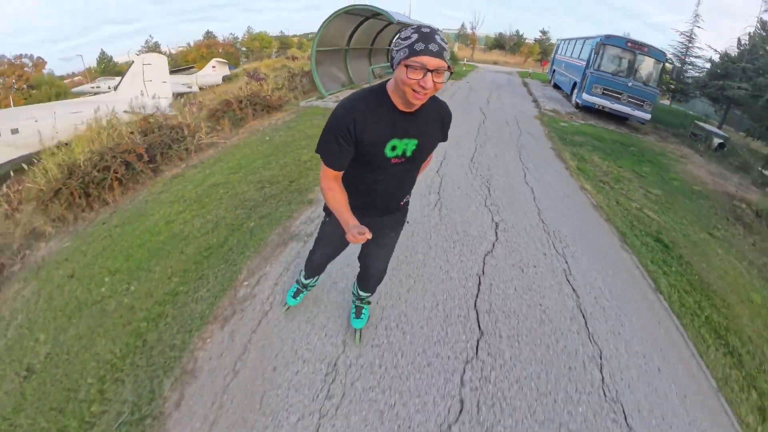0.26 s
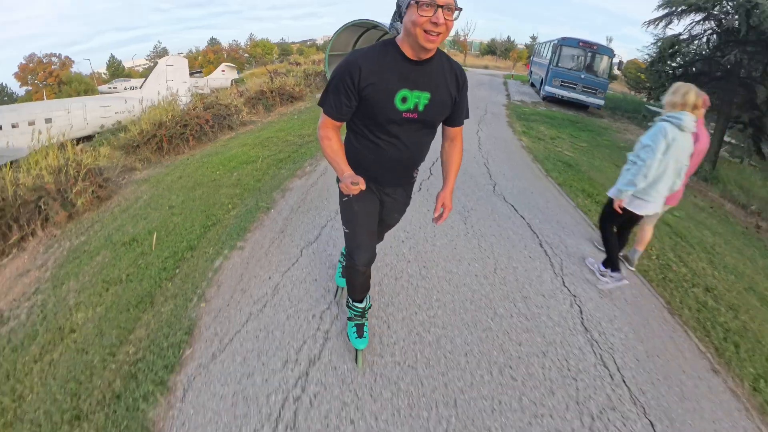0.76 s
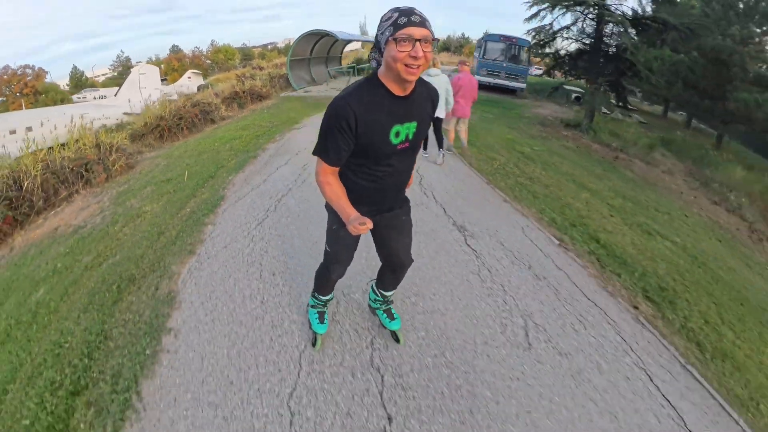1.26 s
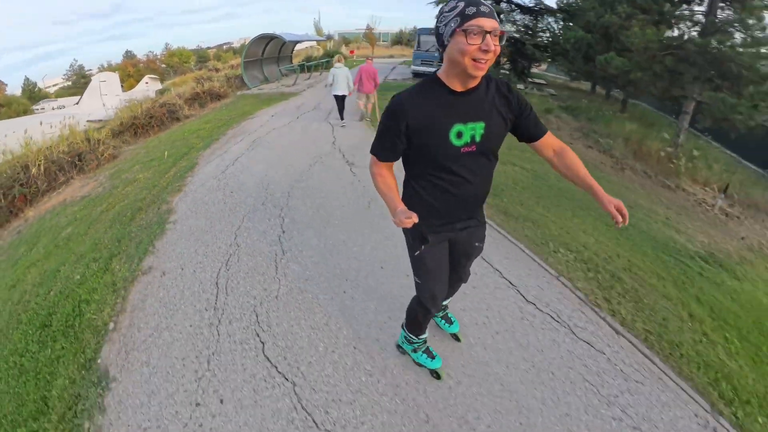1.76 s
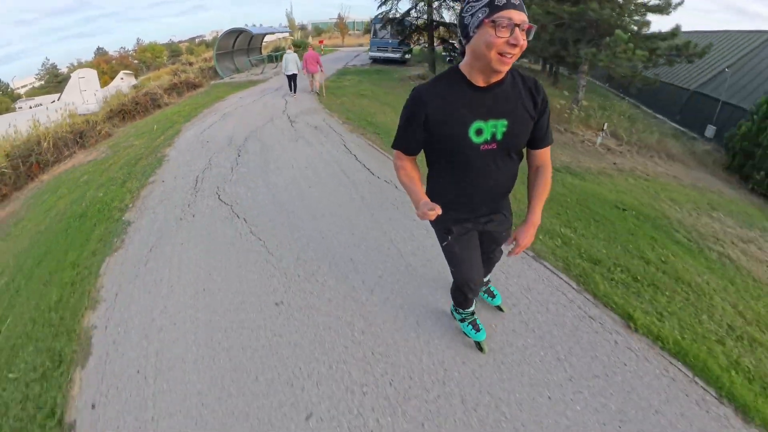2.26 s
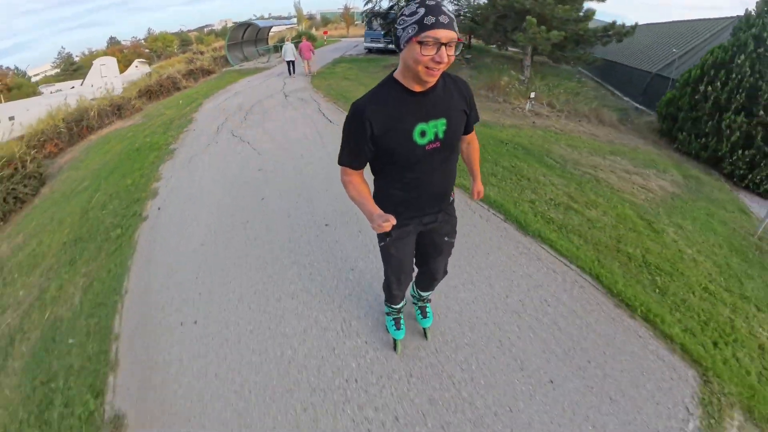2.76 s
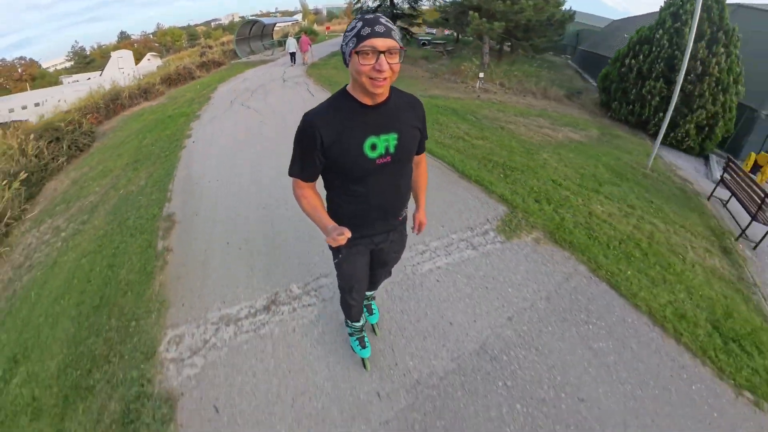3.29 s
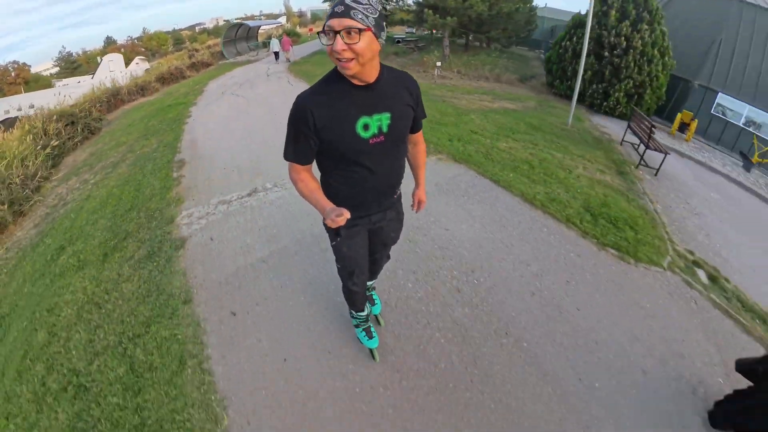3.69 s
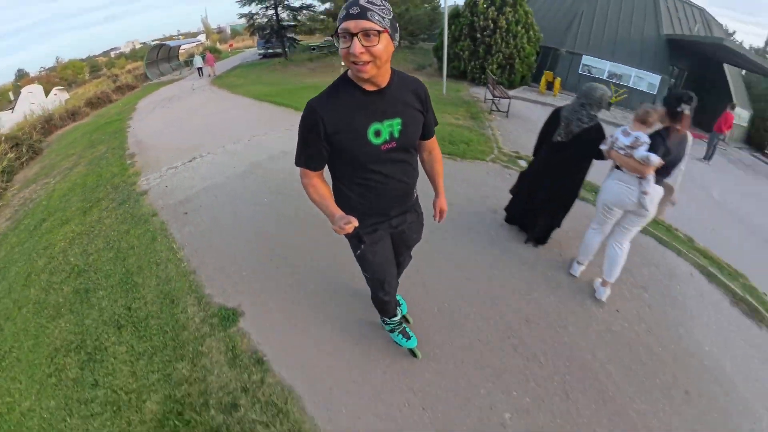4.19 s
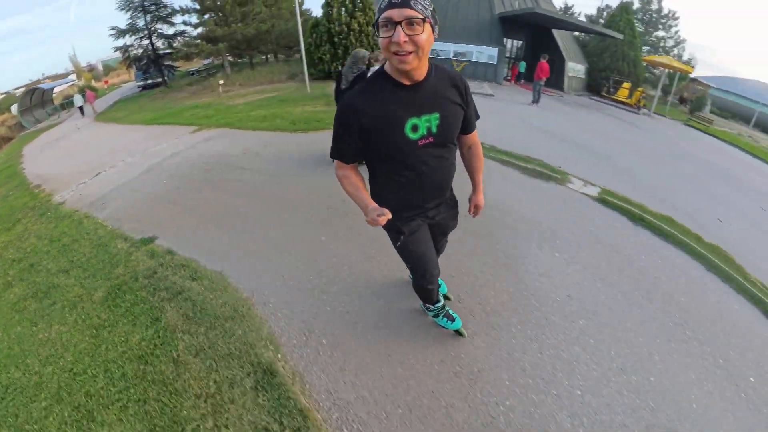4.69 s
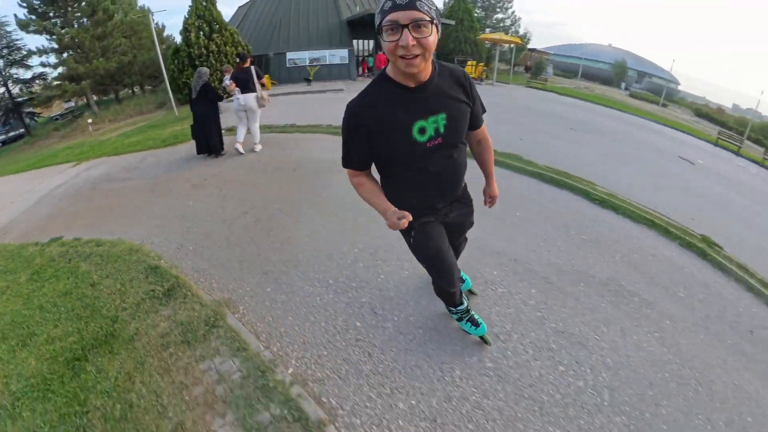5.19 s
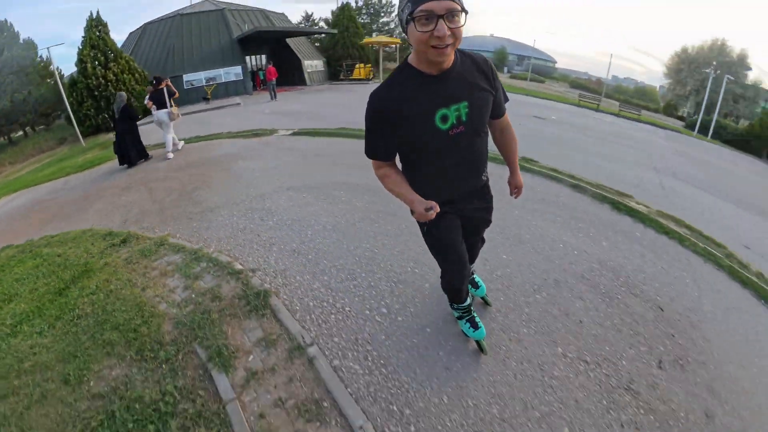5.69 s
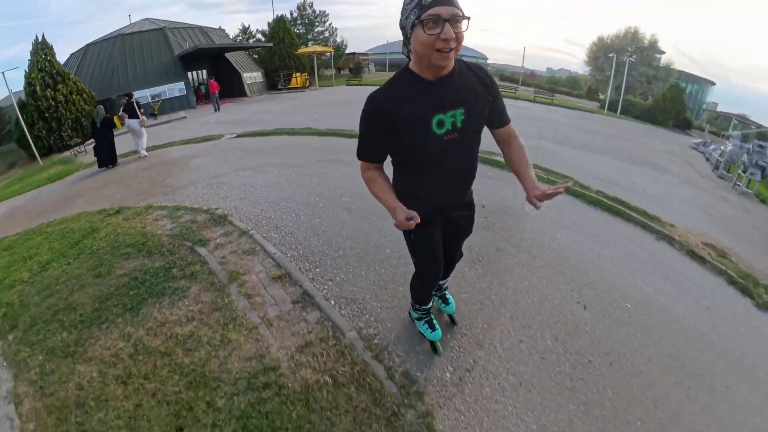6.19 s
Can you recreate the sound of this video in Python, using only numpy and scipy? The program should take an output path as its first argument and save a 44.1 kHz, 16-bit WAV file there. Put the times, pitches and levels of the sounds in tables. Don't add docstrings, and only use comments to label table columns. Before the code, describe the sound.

Wind buffets and rumbles against a microphone in heavy gusts while inline skate wheels hum and crackle over rough, cracked pavement outdoors.

```python
import sys
import numpy as np
from scipy import signal
from scipy.fft import rfft, irfft
from scipy.io import wavfile
from scipy.ndimage import uniform_filter1d, map_coordinates

SR = 44100
rng = np.random.default_rng(int(sys.argv[2]) if len(sys.argv) > 2 else 0)


def wrap_up_sound(samples):
    columns = np.atleast_2d(samples).T
    tamed = np.clip(columns, -1, 1)
    steps = np.round(tamed * 32767).astype(np.int16)
    wavfile.write(sys.argv[1], SR, steps)


def gain_from_db(level_db):
    decades = np.asarray(level_db, float) / 20
    return 10 ** decades


N = 284445

# [t/s, level/dB]
WIND_LEVEL = [(0.0, -32), (0.44, -40), (0.52, -26.5), (0.68, -37), (0.84, -19), (0.96, -28), (1.2, -22.5),
              (1.36, -21), (1.53, -35.5), (2.05, -35.5), (2.26, -37.5), (2.6, -29.5), (3.05, -33),
              (3.36, -24.5), (3.85, -21), (4.28, -26.5), (4.4, -24.5), (4.56, -37), (5.4, -35),
              (6.1, -39.5), (6.45, -41.5)]
# [t/s, ratio/1]
WIND_SPEED = [(.4, 0.84), (.53, 0.98), (.66, 0.91), (.9, 1.04), (1.02, 0.88), (1.3, 1.11), (1.5, 0.77),
              (2.3, 0.68), (2.6, 1.03), (3.2, 0.7), (3.34, 1.2), (3.6, 1.344), (4.0, 1.03), (4.2, 0.72),
              (4.36, 0.68), (4.55, 0.48)]
# [t/s, level/dB]
AIR_SHOVES = [(0.052, -34), (.5, -20), (.58, -18.5), (.66, -18), (.74, -19), (.92, -20), (1.03, -25),
              (2.53, -32.5), (3.2, -37), (3.33, -22), (3.39, -19), (3.46, -17), (3.58, -16), (3.93, -20.5),
              (4.12, -39), (4.43, -21.5), (6.36, -28.5)]
# [f/Hz, level/dB per Hz]
PUSH_SPECTRUM = [(10, -2), (16, -2), (25, -9), (40, -8.5), (70, -15.5), (100, -24.5)]
# [f/Hz, level/dB per Hz]
FLUTTER_SPECTRUM = [(50, -13), (90, -2.5), (150, -1.5), (250, -11.5), (420, -17), (600, -43.5)]
# [t/s, peak level/dB, f/Hz]
SLOW_EDDIES = [(0.019, -20.5, 191), (0.067, -26, 180), (0.171, -23.5, 202), (0.483, -20.5, 232),
               (2.21, -32, 269), (2.335, -31, 186), (2.385, -18, 200), (2.429, -22.5, 151),
               (2.516, -21, 213), (2.549, -32, 161.3), (2.614, -17.5, 277), (2.649, -31, 151),
               (2.702, -26, 193.8), (2.746, -20.5, 179), (2.783, -18, 152), (2.868, -31, 183.1),
               (2.999, -19, 198), (3.056, -20.5, 200), (3.095, -27, 152), (3.132, -26, 186.5),
               (3.171, -21, 193), (3.209, -30, 150), (3.263, -25, 220), (3.301, -20.5, 232),
               (4.505, -23.5, 197), (4.866, -37, 170), (5.228, -29, 173), (5.439, -27, 285),
               (5.611, -42, 157), (5.85, -33, 180)]
# [start t/s, length t/s, eddy level/dB, tearing level/dB]
GUST_PUFFS = [(0.522, 0.0077, -25.5, -48), (0.539, 0.016, -25, -51), (0.596, 0.042, -24, -46),
              (0.662, 0.0051, -30, -65), (0.68, 0.0069, -30.5, -63), (0.706, 0.012, -37, -63),
              (0.722, 0.032, -23.5, -57), (0.754, 0.021, -22.5, -62), (0.794, 0.01, -26, -59),
              (0.824, 0.047, -30, -64), (0.873, 0.048, -22.5, -56), (0.923, 0.028, -23, -50),
              (0.969, 0.014, -24.5, -52), (0.996, 0.056, -24.5, -60), (1.052, 0.055, -23, -53),
              (1.109, 0.101, -24.5, -42.5), (1.215, 0.059, -27.5, -53), (1.258, 0.148, -23, -41.5),
              (1.409, 0.038, -28, -48), (1.45, 0.028, -31, -50), (1.487, 0.031, -40, -60),
              (2.417, 0.16, -47, -65), (2.576, 0.11, -38, -50.5), (2.704, 0.1678, -45.5, -46.5),
              (2.867, 0.11, -52, -54), (3.008, 0.2, -54, -56), (3.17, 0.058, -37.5, -52.5),
              (3.26, 0.027, -41, -51), (3.34, 0.024, -21, -42.5), (3.396, 0.02, -21.5, -39.5),
              (3.446, 0.03, -20.5, -36), (3.476, 0.188, -23.5, -35.5), (3.655, 0.13, -24.5, -37),
              (3.806, 0.046, -22, -36.5), (3.858, 0.053, -22.5, -37.5), (3.926, 0.044, -23, -39),
              (3.98, 0.028, -21, -35.5), (4.058, 0.021, -20, -41), (4.097, 0.033, -21.5, -40),
              (4.142, 0.05, -22, -46.5), (4.325, 0.015, -24, -55), (4.326, 0.014, -26, -66),
              (4.362, 0.037, -20, -49), (4.412, 0.015, -29.5, -50), (4.442, 0.0094, -34, -60),
              (4.5, 0.057, -36.5, -58)]
# [f/Hz, level/dB per Hz]
EDDY_SPECTRUM = [(200, 3.5), (300, 2.5), (500, 1), (750, 0), (870, -11.5), (1000, -18), (1300, -34)]
# [f/Hz, level/dB per Hz]
TEARING_SPECTRUM = [(500, -32), (850, -0.5), (1050, 5.5), (1800, -3), (2600, -12), (3740, -22.5),
                    (7000, -43.5), (15400, -120)]
# [t/s, peak level/dB, ring f/Hz, sharp edge level against the peak/dB]
EDDY_SLAPS = [(0.528, -19, 816, -18), (0.545, -17, 574, -35), (0.585, -18, 410, -20),
              (0.598, -15.5, 640, -30), (0.619, -28, 590, -27), (0.627, -41, 570, -28),
              (0.657, -20, 480, -40), (0.679, -28, 564, -35), (0.704, -23, 414, -32),
              (0.721, -27, 516, -33), (0.752, -20, 650, -13), (0.775, -16, 467, -13),
              (0.792, -22, 560, -30), (0.7956, -23, 690, -2.5), (0.835, -17, 516, -35),
              (0.871, -17.5, 543, -23), (0.901, -16.5, 820, -26), (0.93, -19.5, 613, -9),
              (0.974, -18.5, 475, -24), (0.997, -21, 584, -24), (2.611, -26, 384, -26),
              (3.3395, -15.5, 910, -22), (3.367, -18.5, 829.7, -25), (3.355, -14.5, 742, -16),
              (3.388, -17, 534.9, -28), (3.411, -14.5, 880, -15), (3.44, -14, 520, -37),
              (4.05, -18.5, 650, -30), (4.292, -38, 400, -16), (4.317, -18.5, 540, -18.5),
              (4.354, -29, 452.2, -33), (4.42, -22, 640, -10), (4.445, -28, 397, -20),
              (4.184, -16, 564, -20), (4.545, -28.5, 402, -20)]
# [t/s, level/dB]
HISS_LEVEL = [(0, -73), (.5, -80), (1.0, -88), (2.1, -76), (2.55, -68), (3.0, -84), (3.6, -72), (4.1, -83),
              (5.5, -74), (5.9, -69), (6.45, -67)]
# [t/s, level/dB]
ROAD_LEVEL = [(0.0, -66), (0.27, -57), (0.42, -61), (0.72, -66.5), (1.13, -65.5), (1.32, -61.5),
              (1.5, -58.5), (1.75, -58.5), (2.09, -62), (2.35, -58), (2.75, -58), (2.95, -64), (3.55, -60),
              (4.07, -65), (4.7, -58), (5.65, -54), (6.1, -63.5), (6.45, -62)]
# [f/Hz, width f/Hz, level/dB]
FRAME_MODES = [(410, 160, 10), (753, 300, 6.5), (1002, 312, 7), (1738, 620, 1.5), (3200, 670, -13)]
# [f/Hz, level/dB per Hz]
GRIT_SPECTRUM = [(1180, -26), (2000, -3.5), (3300, 0), (4260, -2), (4640, -2), (7570, -13), (9880, -15),
                 (15600, -19.5)]
# [t/s, peak level/dB, ring f/Hz]
GRIT_SNAPS = [(0.2257, -44, 6560), (0.3274, -51, 5210), (0.4694, -55, 5570), (1.4187, -54, 6014),
              (1.7484, -40, 7360), (1.7624, -47, 7510), (1.8424, -39, 7130), (1.9375, -50, 6010),
              (1.9613, -45, 6920), (2.4084, -44, 7790), (2.449, -40, 5540), (2.4894, -49, 5840),
              (4.3844, -40.5, 5010), (4.421, -41, 5160), (4.4357, -43, 5513), (4.485, -42, 7550),
              (4.5114, -47, 8800), (4.5214, -39, 6260), (4.5451, -53, 5460), (4.546, -44, 7010),
              (4.6234, -41, 6900), (4.6534, -45, 5280), (4.7504, -40, 7750), (4.7614, -48, 6030),
              (4.775, -42, 7170), (4.7864, -42, 5180), (4.8085, -42, 5000), (4.8085, -39, 5190),
              (4.8674, -41, 6430), (4.8824, -38, 5700), (4.89, -39, 5150), (4.982, -36, 7060),
              (5.007, -38, 5210), (5.057, -37, 6000), (5.0928, -35, 5270), (5.1274, -41, 6570),
              (5.2021, -43, 5020), (5.5807, -35, 5380), (5.6326, -32.5, 4997), (5.8694, -47, 6950),
              (6.2103, -48, 6790), (6.2274, -50, 5070), (6.287, -39, 6510), (6.38, -38, 8000),
              (6.001, -42, 6000), (6.191, -44, 8000), (5.843, -47, 9000), (0.8155, -47, 6000),
              (3.3032, -37, 5000), (4.615, -46, 8000), (5.569, -44, 8000)]
# [t/s, peak level/dB, ring f/Hz]
ASPHALT_CRACKS = [(4.982, -46, 3000), (5.01, -40, 2802), (0.2515, -31, 2640), (0.531, -33, 2764),
                  (0.608, -30, 2330), (5.055, -34, 2895), (1.222, -31.5, 2340), (1.326, -28.5, 2200),
                  (1.461, -28, 2300), (2.362, -22.5, 2620), (2.461, -36, 2263), (4.6, -28.5, 2940),
                  (4.74, -30, 2350), (4.797, -28, 2430), (4.8578, -30.5, 2640), (4.936, -29, 2480),
                  (4.969, -26, 2640), (4.994, -27.5, 2920), (5.079, -27, 2850), (5.116, -34, 3020),
                  (5.155, -27, 2650), (5.264, -28.5, 2230), (5.357, -25, 2600), (5.441, -40, 2770),
                  (5.237, -31, 2790), (5.303, -41, 2780), (5.319, -35, 3000), (5.366, -28, 2800),
                  (5.452, -34, 3000), (5.467, -29, 3000), (5.56, -30, 3200), (5.606, -44, 3000),
                  (5.6237, -33, 3060), (5.654, -41, 2600), (5.696, -33, 2800), (5.777, -41, 3250),
                  (6.006, -40, 3000), (6.232, -38, 2500), (5.501, -27.5, 2850), (5.5488, -27, 3640),
                  (5.5807, -29, 2490), (5.634, -29, 2430), (5.6685, -23, 2940), (6.389, -31.5, 3140)]
# [t/s, peak level/dB, ring f/Hz]
LOOSE_PEBBLES = [(0.285, -28.5, 2580), (1.863, -31.5, 3240), (1.892, -36, 3700), (1.554, -37, 3020),
                 (1.8, -38, 3000), (2.244, -34, 3000), (2.325, -33, 3000), (2.373, -34, 3000),
                 (1.917, -34, 3410), (1.9783, -29.5, 3400), (2.0345, -32, 3330), (2.0607, -31, 3310),
                 (2.148, -43, 2520), (2.2303, -38, 3580), (2.315, -28.5, 3490), (3.286, -28, 3580),
                 (4.362, -30, 2200), (4.588, -34, 2716), (4.642, -31.5, 2610), (6.0882, -37.5, 3040),
                 (6.1906, -42, 2290), (6.2706, -38, 2617), (6.285, -34, 3200), (6.3042, -38, 2830),
                 (6.345, -31, 2773), (5.254, -34, 3000), (5.274, -48, 3000), (5.33, -32, 5000),
                 (5.481, -34, 5000), (5.688, -28, 3500), (5.814, -34, 3000), (6.1072, -34, 2970),
                 (6.38, -36, 3000), (1.716, -47, 2500), (1.872, -39, 3000), (2.258, -35, 2600),
                 (2.295, -42, 2600), (2.4, -35, 3310), (0.293, -39, 3000), (0.351, -53, 3000)]
# [t/s, peak level/dB, ring f/Hz]
ROAD_RIDGES = [(0.2252, -45, 2430), (0.96, -61, 2360), (1.295, -41, 2570), (1.5, -55, 2556),
               (1.478, -41, 2620), (1.4812, -32, 3100), (1.4894, -38, 2300), (1.512, -39, 2300),
               (1.5199, -33, 2620), (1.528, -52, 2800), (1.5652, -46, 2400), (1.5777, -40, 2200),
               (1.589, -43, 2400), (1.592, -39, 2300), (1.6102, -52, 2300), (1.623, -34.5, 3230),
               (1.6476, -40, 2450), (1.659, -34.5, 3020), (1.6675, -39, 2700), (1.6782, -43, 2300),
               (1.7425, -39.5, 1960), (1.793, -38, 2180), (2.4092, -48, 3480), (3.3021, -31.5, 3010),
               (5.5802, -51, 2200), (5.6633, -41, 2200), (5.7105, -52, 2270), (6.001, -44, 3180)]
# [t/s, peak level/dB, ring f/Hz]
HARD_CHIPS = [(0.0542, -40, 2620), (0.124, -35.5, 4300), (0.1726, -27.5, 4230), (0.25, -43, 7160),
              (0.261, -39, 7400), (0.271, -41, 7260), (0.3192, -53, 5500), (0.6085, -36.5, 4700),
              (0.815, -30, 3380), (0.818, -31.5, 1900), (0.8872, -43.9, 3900), (4.127, -45, 5208),
              (4.1581, -51, 6236), (5.7109, -23.5, 2280)]
# [ring level/dB, top level/dB, knock level/dB, share of rattle/1, rattle decay t/s]
TICK_SOUNDS = [
    (7, -21, -7, 0.11, 0.0097),
    (7, 3.5, -1, 0.066, 0.015),
    (12, -25, 8, 0.38, 0.0074),
    (20, -38, -32, 0.038, 0.003),
]
# [f/Hz, level/dB]
MICROPHONE_RESPONSE = [(6, 0), (6000, 0), (7600, 3), (9500, 0), (11300, 0), (13100, -10), (15720, -7),
                       (15950, -50)]


def in_time(rows):
    s, *columns = np.transpose(rows)
    return [np.interp(np.arange(N) / SR, s, c) for c in columns]


def at_hz(points, hz):
    corners_hz, levels_db = np.transpose(points)
    return np.interp(np.log(hz), np.log(corners_hz), levels_db)


def rms_one(x):
    return x / np.sqrt(np.mean(x ** 2) + 1e-20)


def coloured(x, points):
    hz = np.arange(len(x) // 2 + 1) * SR / len(x) + 1e-3
    below = (points[0][0] / 3, points[0][1] - 30)
    above = (points[-1][0] * 3, points[-1][1] - 60)
    closed = [below] + list(points) + [above]
    return irfft(rfft(x) * gain_from_db(at_hz(closed, hz)), len(x))


def drift(rate):
    r = np.exp(-16 * np.pi * rate / SR)
    white = rng.standard_normal(N // 8 + 4002)
    slow = signal.lfilter([1], [1, -2 * r, r * r], white)[4000:]
    return np.interp(np.arange(N) / 8, np.arange(len(slow)), rms_one(slow))


def resonance(x, hz, width_hz):
    r = np.exp(-np.pi * width_hz / SR)
    poles = [1, -2 * r * np.cos(2 * np.pi * hz / SR), r * r]
    return signal.lfilter([(1 - r * r) / 2, 0, (r * r - 1) / 2], poles, x)


def twice(x, hz, width_hz, second_width_hz):
    return resonance(resonance(x, hz, width_hz), hz, second_width_hz)


def add_at(out, s, sound):
    at = round(s * SR)
    out[at:at + len(sound)] += sound


def headwind():
    flutter_db, = in_time(WIND_LEVEL)
    speed, = in_time(WIND_SPEED)
    t = np.arange(N) / SR
    shove_width_s = 0.1
    shoves = sum((gain_from_db(db) * np.exp(-((t - s) / shove_width_s) ** 2)) ** 2 for s, db in AIR_SHOVES)
    calm_push = gain_from_db(-27 + 0.24 * (flutter_db + 40.5))
    push_gain = np.sqrt(calm_push ** 2 + shoves * gain_from_db(-0.5) ** 2)
    push_gain = push_gain / (1 + shoves / gain_from_db(-23.0) ** 2) ** 0.33
    sway_hz = 17.0 * speed ** 0.41
    sway = np.sin(2 * np.pi * np.cumsum(sway_hz) / SR)
    push = rms_one(coloured(rng.standard_normal(N + 1), PUSH_SPECTRUM)[:N])
    push = rms_one(np.tanh(0.8 * push))
    flutter = coloured(rng.standard_normal(N + 1), FLUTTER_SPECTRUM)[:N]
    flutter = rms_one(flutter * gain_from_db(1.27 * drift(16.0)))
    return (gain_from_db(0.15) * push_gain * push + gain_from_db(0.5) * np.sqrt(shoves) * sway
            + gain_from_db(flutter_db + 0.37) * flutter)


def thumps():
    out, t = np.zeros(N + 1800), np.arange(1800) / SR
    chance = rng.standard_normal((len(SLOW_EDDIES), 1))
    for (s, db, hz), noise in zip(SLOW_EDDIES, chance):
        cycles = hz * t - 1.1
        swing = np.cos(2 * np.pi * cycles) * np.exp(-(cycles / 0.63) ** 2)
        add_at(out, s, gain_from_db(db + 0.5) * np.sign(noise[0]) * swing)
    return out[:N]


def puffs(levels_db, rise_db_per_s, fall_db_per_s):
    t, out = np.arange(N) / SR, np.full(N, -200.)
    for (s, length, *_), db in zip(GUST_PUFFS, levels_db):
        rise = rise_db_per_s * np.maximum(s - t, 0)
        fall = fall_db_per_s * np.maximum(t - s - length, 0)
        out = np.maximum(out, db - rise - fall)
    return gain_from_db(out)


def gusts():
    _, _, eddy_db, tearing_db = np.transpose(GUST_PUFFS)
    speed, = in_time(WIND_SPEED)
    bursts = drift(78)
    white = rng.standard_normal((2, 2 * N))
    passed_by = np.clip(speed, .5, 1.6)
    passed = np.cumsum(passed_by)
    eddies = map_coordinates(coloured(white[0], EDDY_SPECTRUM), [passed], order=3)
    eddies = rms_one(eddies * gain_from_db(1.24 * bursts / passed_by))
    tearing = map_coordinates(coloured(white[1], TEARING_SPECTRUM), [passed * .8], order=3)
    tearing = rms_one(tearing * gain_from_db(1.3 * bursts + 3.1 * np.tanh(drift(180))))
    return puffs(eddy_db, 1602, 1293) * eddies + puffs(tearing_db + 7.0, 902, 1298) * tearing


def slaps():
    out, t = np.zeros(N + 1800), np.arange(1800) / SR
    chance = rng.standard_normal((len(EDDY_SLAPS), 1))
    for (s, db, hz, edge_db), noise in zip(EDDY_SLAPS, chance):
        swing = np.sin(2 * np.pi * hz * t * (1 - 6 * t))
        swing = swing * (1 - np.exp(-(t / 0.00072) ** 2)) * np.exp(-t / 0.0041)
        edge = np.sin(2 * np.pi * 1350 * (t - .002)) * np.exp(-((t - .002) / 0.00047) ** 2)
        slap = gain_from_db(db + 4.5) * np.sign(noise[0]) * swing + gain_from_db(db + edge_db + 6.0) * edge
        add_at(out, s, slap)
    return out[:N]


def fine_hiss():
    level_db, = in_time(HISS_LEVEL)
    noise = rng.standard_normal(N)
    return gain_from_db(level_db) * rms_one(resonance(resonance(noise, 8500, 5000), 9500, 6000))


def random_sizes(spread_db):
    return gain_from_db(spread_db * np.minimum(rng.exponential(1, N), 3)) * rng.choice([-1, 1], N)


def sand(bumps):
    sizes = random_sizes(3)
    flicks = sizes * (rng.random(N) < 420 * gain_from_db(5 * bumps) / SR)
    fading = rng.standard_normal(80) * np.exp(-np.arange(80) / 18)
    flicks = np.convolve(flicks, fading)[:N] + 1e-18
    dealt = np.repeat(rng.integers(0, 5, N // 200 + 1), 200)[:N]
    colours = [(2600, 13.0), (3700, 3.0), (5200, -2.0), (7000, -5.0), (8800, -15.0)]   # f/Hz, level/dB
    return rms_one(sum(twice(flicks * (dealt == k), hz, 0.68 * hz, 0.68 * hz) * gain_from_db(db)
                       for k, (hz, db) in enumerate(colours)))


def wheels():
    grit_db, = in_time(ROAD_LEVEL)
    hum_db = -51 + 0.62 * (grit_db + 60)
    bumps = drift(34)
    road = rng.standard_normal(N) * gain_from_db(2.1 * bumps + 0.5 * drift(2.9))
    hum = sum((-1) ** k * gain_from_db(db) * twice(road, hz, 1.44 * width, 1.44 * width)
              for k, (hz, width, db) in enumerate(FRAME_MODES))
    sizes = random_sizes(5)
    grains_per_s = 800 * gain_from_db(5.5 * np.minimum(bumps, 2) + 4 * drift(9))
    grains = sizes * (rng.random(N) < grains_per_s / SR)
    fading = rng.standard_normal(260) * np.exp(-np.arange(260) / (0.00052 * SR))
    crunch = rms_one(np.convolve(grains, fading)[:N]) * gain_from_db(1.5)
    crunch = crunch + rng.standard_normal(N) * gain_from_db(0.25 * bumps)
    grit = rms_one(coloured(np.append(crunch, 0), GRIT_SPECTRUM)[:N])
    smooth = np.clip(0.042 * (-58.0 - grit_db), 0, .8)
    grit = grit - smooth * resonance(grit, 5850, 2600)
    return gain_from_db(hum_db + 5.0) * rms_one(hum) + gain_from_db(grit_db + 3.5) * (grit + gain_from_db(-4.5) * sand(bumps))


def snaps():
    out, t = np.zeros(N + 300), np.arange(300) / SR
    chance = rng.standard_normal((len(GRIT_SNAPS), 300))
    for (s, db, hz), noise in zip(GRIT_SNAPS, chance):
        burst = noise / np.std(noise[:50]) * (1 - np.exp(-t / 0.00045)) * np.exp(-t / 0.0009)
        ring = resonance(burst, hz, 0.45 * hz)
        body = gain_from_db(6.0) * resonance(burst, 3400, 2500)
        air = gain_from_db(-19.0) * resonance(burst, 11800, 5000)
        add_at(out, s, gain_from_db(db + 3.5) * (ring + body + air))
    return out[:N]


def ticks():
    out, t = np.zeros(N + 1400), np.arange(1400) / SR
    tables = (ASPHALT_CRACKS, LOOSE_PEBBLES, ROAD_RIDGES, HARD_CHIPS)
    rows = [row + kind for table, kind in zip(tables, TICK_SOUNDS) for row in table]
    chance = rng.standard_normal((len(rows), 1400))
    knock_hz, frame_hz = 1730, FRAME_MODES[1][0]
    for (s, db, hz, ring_db, top_db, knock_db, rattle, rattle_s), noise in zip(rows, chance):
        decay = np.exp(-t / 0.00096) + rattle * np.exp(-t / rattle_s)
        burst = noise / np.std(noise[20:90]) * (1 - np.exp(-t / 0.00088)) * decay
        body = resonance(resonance(burst, 2430, 3600), 2230, 3400) * gain_from_db(10.0)
        ring = twice(burst, hz, .15 * hz, .6 * hz) * gain_from_db(ring_db + 1.5)
        top = resonance(resonance(resonance(burst, 6200, 7000), 4000, 6000), 5700, 6000) * gain_from_db(top_db)
        knock = twice(burst, knock_hz, 450, 2440) * gain_from_db(knock_db + 20)
        knock = knock + twice(burst, frame_hz, 320, 840) * gain_from_db(knock_db + 19.5)
        add_at(out, s, gain_from_db(db - 2.5) * (body + ring + top + knock))
    return out[:N]


def scene():
    return (wheels() + ticks() + headwind() + gusts() + slaps() + snaps() + thumps() + fine_hiss())[None]


def low_pass(x):
    return signal.sosfilt(signal.butter(12, 15720, fs=SR, output="sos"), x)


def record(dry):
    level_db = 10 * np.log10(uniform_filter1d(dry ** 2, size=700) + 1e-12)
    held = dry * gain_from_db(-.4 * np.maximum(level_db + 17.5, 0))
    padded = np.pad(.5 * np.tanh(held[0] / .5), (2000, 2001), "reflect")
    dull = coloured(padded, MICROPHONE_RESPONSE)[None, 2000:2000 + N]
    from_end = np.minimum(np.arange(N), np.arange(N)[::-1])
    mix = dull * np.minimum(from_end / 90, 1)
    return low_pass(mix)


dry = scene()
out = record(dry)
wrap_up_sound(out)
```